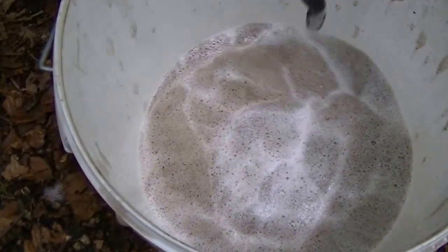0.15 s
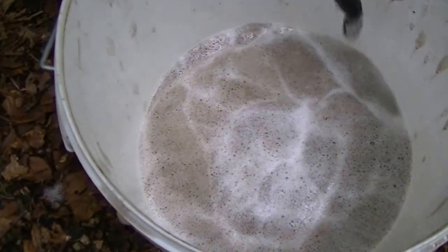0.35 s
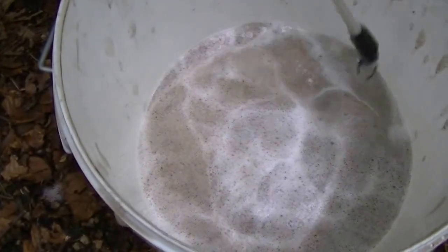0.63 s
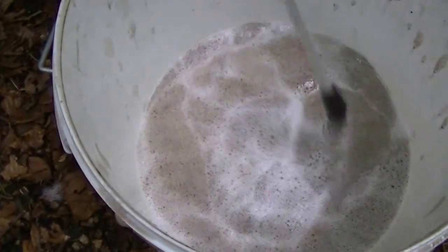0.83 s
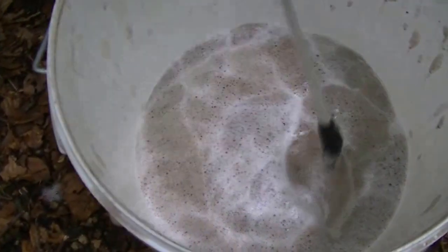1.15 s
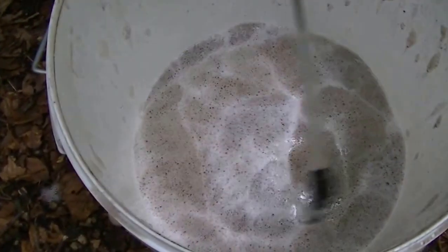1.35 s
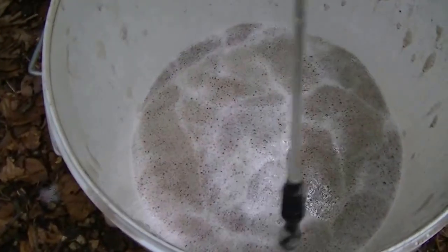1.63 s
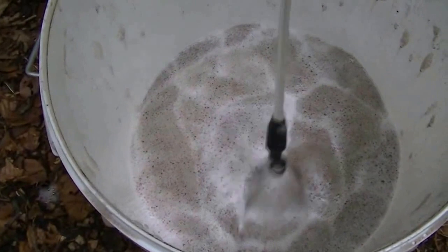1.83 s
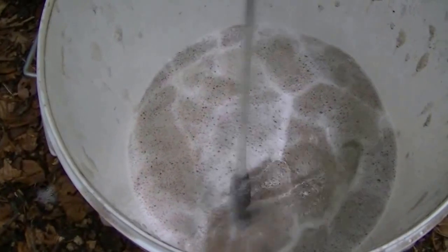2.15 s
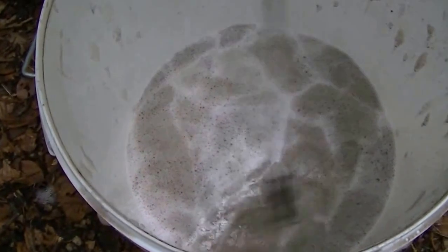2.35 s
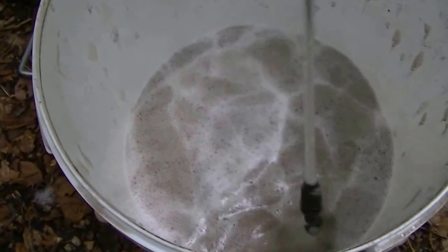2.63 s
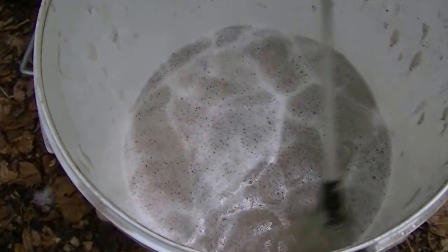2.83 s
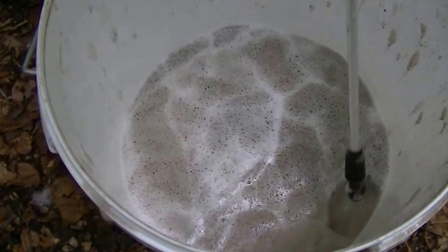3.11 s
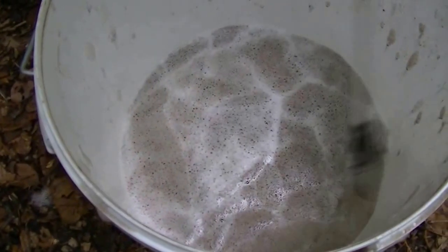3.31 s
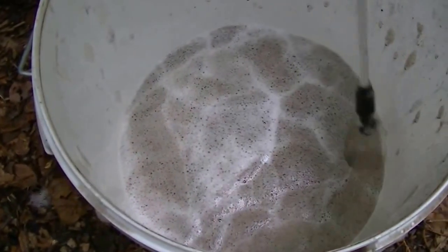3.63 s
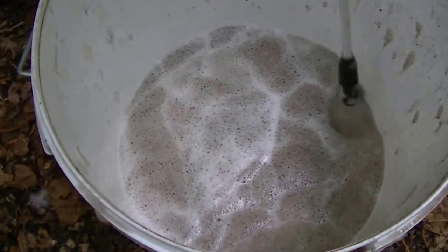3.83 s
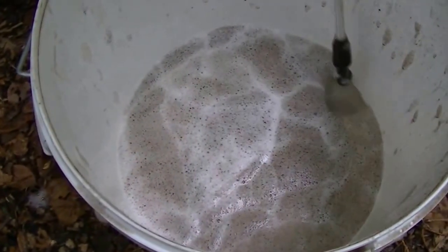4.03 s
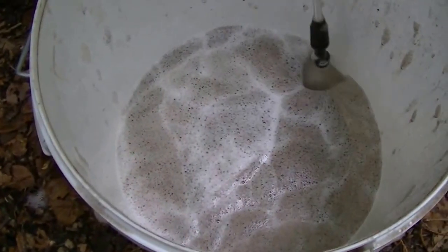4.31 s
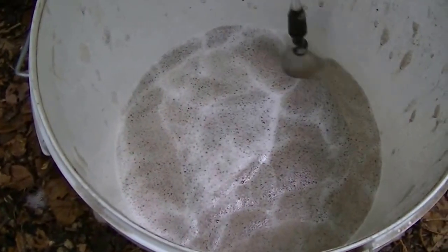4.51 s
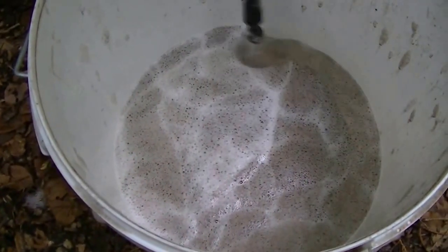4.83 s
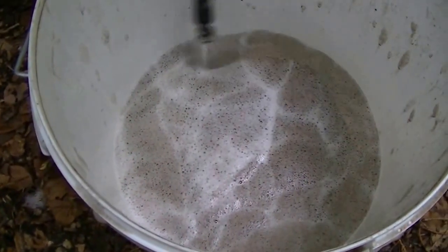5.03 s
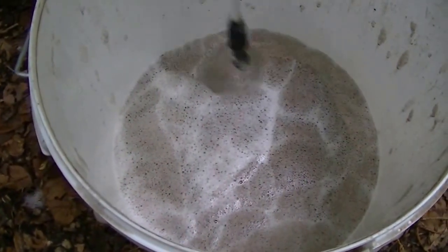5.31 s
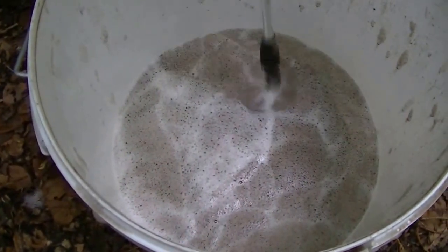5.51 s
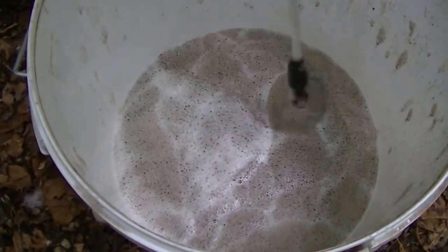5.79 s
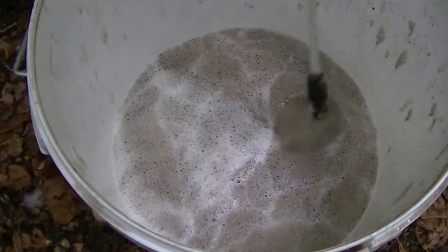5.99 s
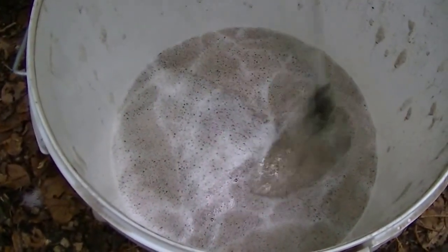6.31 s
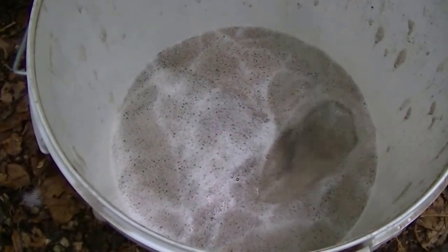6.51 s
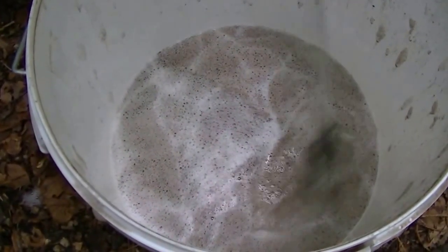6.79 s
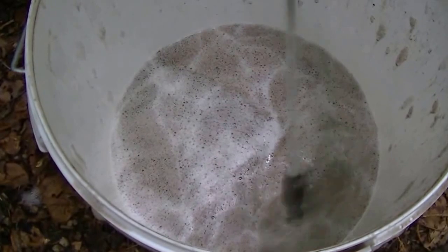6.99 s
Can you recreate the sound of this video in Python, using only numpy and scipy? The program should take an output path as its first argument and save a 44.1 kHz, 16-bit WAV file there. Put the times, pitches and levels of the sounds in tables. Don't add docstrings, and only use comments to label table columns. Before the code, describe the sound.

Close, almost centred pickup of water spraying into foamy liquid in a bucket outdoors. A sharp plastic knock opens over steady hiss; the jet stops abruptly for about half a second, exposing quiet bubble crackle, small lever clicks and a tiny valve sputter. The spray then returns quickly and continues to the end, slightly softer, fluttering and changing in hollow tint.

```python
import sys
import numpy as np
from scipy import signal
from scipy.fft import rfft, irfft, next_fast_len
from scipy.io import wavfile
from scipy.ndimage import uniform_filter1d, map_coordinates

SR = 44100
rng = np.random.default_rng(int(sys.argv[2]) if len(sys.argv) > 2 else 0)


def ratio(d):
    e = np.asarray(d, float) / 20
    return 10 ** e


def inscribe(sig):
    pcm = np.round(np.clip(np.atleast_2d(sig).T, -1, 1) * 32767)
    wavfile.write(sys.argv[1], SR, pcm.astype(np.int16))


N = 315315


def unit(x):
    return x / np.sqrt(np.mean(x ** 2) + 1e-20)


def along(points, hz):
    f, v = np.transpose(points)
    return np.interp(np.log(hz + 1), np.log(f + 1), v)


def curves(rows, t):
    s, *cols = np.transpose(rows)
    return [np.interp(t, s, c) for c in cols]


def wobble(knots_per_s):
    knots = rng.standard_normal(int(N * knots_per_s / SR) + 4)
    return map_coordinates(knots, [np.arange(N) * knots_per_s / SR])


def bump(x, centre, width):
    return np.exp(-((x - centre) / width) ** 2)


def filtered(x, response):
    m = next_fast_len(N + 8192)
    return irfft(rfft(x, m) * response(np.fft.rfftfreq(m, 1 / SR)), m)[..., :N]


def droplets(spiky_db):
    size = uniform_filter1d(rng.standard_normal(N), size=24)
    return unit(rng.standard_normal(N) * ratio(spiky_db * unit(size)))


def shaped(x, gain_db, patchy_db, streaky_db):
    hz, t, z = signal.stft(x, SR, nperseg=512, noverlap=384)

    def field(bins, frames):
        across_hz = uniform_filter1d(rng.standard_normal(z.shape), bins, 0)
        return unit(uniform_filter1d(across_hz, frames, 1))

    chance_db = patchy_db * field(bins=6, frames=30) + streaky_db * field(bins=2, frames=160)
    z = z * ratio(gain_db(hz[:, None], t) + chance_db)
    return signal.istft(z, SR, nperseg=512, noverlap=384)[1][:N]


# (frequency [Hz], density [dB per Hz])
RUMBLE_SPECTRUM = [(12, -45), (20, 6), (86, 3), (124, 6.5), (225, -47), (250, 0.5), (320, -25), (550, -120)]
# (frequency [Hz], density [dB per Hz])
AIR_SPECTRUM = [(60, -30), (130, -18), (240, -8), (500, -3), (1500, -3), (3200, -11), (8400, -13),
                (15800, -30)]


def rumble():
    noise = rng.standard_normal((3, N))
    common, left, right = filtered(noise, lambda hz: ratio(along(RUMBLE_SPECTRUM, hz)))
    air = filtered(rng.standard_normal((2, N)), lambda hz: ratio(along(AIR_SPECTRUM, hz)))
    far = unit(np.array([common + 0.86 * left, common + 0.83 * right]))
    return ratio(-91.5) * far + ratio(-70.5) * unit(air)


# (frequency [Hz], density [dB per Hz])
FIZZ_SPECTRUM = [(120, -52), (200, -28), (268, -7), (316, -10), (372, -3.5), (447, -8), (537, 1),
                 (1340, -3.5), (2280, -0.5), (3530, -4.5), (4900, -4), (8800, -9), (15800, -20.5)]
# (time [s], level [dB])
FOAM_LEVEL = [(1.07, -55), (1.27, -61), (1.36, -57), (1.42, -51), (1.49, -55.5), (1.57, -52), (2.9, -54),
              (5, -59), (7.15, -54.5)]
# (time [s], level over the fizz [dB])
VALVE_SPITS = [
    (1.431, 5),
    (1.451, 7),
    (1.477, 6),
]


def fizz_colour(hz, t):
    whistle_db = 12 * bump(hz, 1770, 70) + 6 * bump(hz, 2450, 150) - 2.5 * (hz > 3000)
    return along(FIZZ_SPECTRUM, hz) + bump(t, 1.46, .04) * whistle_db


def foam():
    t = np.arange(N) / SR
    fizz = unit(shaped(droplets(spiky_db=1.9), fizz_colour, patchy_db=2.1, streaky_db=1.24))
    spits_db = sum(db * bump(t, s, .007) for s, db in VALVE_SPITS)
    return fizz * ratio(curves(FOAM_LEVEL, t)[0] + spits_db + 0.73 + 0.41 * wobble(60))


# (time [s], peak [dB], ring [Hz], overtone re ring [dB], thud re peak [dB])
LEVER_KNOCKS = [(0.028, -21, 428, -27, -52), (0.139, -48, 300, -1, -17), (0.166, -36.5, 600, 10, -31),
                (.176, -43.5, 342, -22, -23), (1.369, -35.5, 587, 2, -20), (1.403, -50, 540, 6, -18),
                (1.424, -48, 610, -2, -26), (1.429, -42, 580, 5, -29), (1.446, -45, 500, -4, -22),
                (1.48, -44, 1210, 5, -28), (1.887, -41, 587, -4, -18), (1.897, -44, 349, 2, -26)]


def knocks():
    rings, pushes, t = np.zeros(N + SR), np.zeros(N + SR), np.arange(SR // 8) / SR
    for s, db, hz, over_db, thud_db in LEVER_KNOCKS:
        t60 = 16.5 / hz
        turns = 2 * np.pi * hz * np.cumsum(1 + 0.51 * np.exp(-t / 0.0017)) / SR
        overtone = ratio(over_db + 5 * t / t60) * np.sin(2 * np.pi * 1.87 * hz * t)
        ring = (np.sin(turns) + overtone) * ratio(-60 * t / t60) * (1 - np.exp(-t / 0.0011))
        snap = 1.1 * np.sin(2 * np.pi * 900 * t) * ratio(-60 * t / 0.0062)
        tick = np.sin(2 * np.pi * 1800 * t) * ratio(-60 * t / 0.002)
        crack = ratio(-7 - 60 * t / .003) * rng.standard_normal(len(t))
        sagging = 2 * np.pi * np.cumsum(150 + 150 * np.exp(-t / .012)) / SR
        push = np.sin(sagging) * bump(t, .012, .007)
        start = round(s * SR)
        rings[start:][:len(t)] += ratio(db) * (ring + snap + tick + crack)
        pushes[start:][:len(t)] += ratio(db + thud_db) * push
    low_cut = signal.butter(4, 330 / (SR / 2), "high", output="sos")
    return (signal.sosfilt(low_cut, rings) + pushes)[:N]


# (time [s], length [s], level [dB], frequency [Hz])
PUFFS = [
    (.172, .01, -70, 110),
    (1.465, .02, -57, 1780),
    (1.58, .012, -57, 1780),
    (1.58, .025, -58, 520),
]


def puffs():
    t = np.arange(N) / SR
    total = np.zeros(N)
    for s, length_s, db, hz in PUFFS:
        total += ratio(db + 2.7 * wobble(97)) * bump(t, s, length_s) * np.sin(2 * np.pi * hz * t)
    return total


# (frequency [Hz], width [Hz], gain [dB])
HOUSING_MODES = [(198, 47, -6), (776, 47, -0.5), (1135, 110, 3), (2250, 67, 2), (3920, 106, -3.5),
                 (4930, 940, 1.5), (5300, 150, -1), (6690, 280, -1.5), (7260, 210, 0.5)]


def housing(hz):
    return sum(db * bump(hz, centre_hz, width_hz) for centre_hz, width_hz, db in HOUSING_MODES)


def echo(hz, share, delay_ms, top_hz):
    strength = np.clip(share, -.9, .9) / (1 + (hz / top_hz) ** 2)
    return 20 * np.log10(abs(1 + strength * np.exp(-2j * np.pi * hz * delay_ms / 1000)))


# (frequency [Hz], density [dB per Hz])
JET_SPECTRUM = [(88, -49), (150, -51), (264, -28), (397, -24), (756, -8), (2340, -2), (3880, -2),
                (4720, -0.5), (10500, -5.5), (15800, -19.5)]
# (time [s], depth in the froth [dB], surface echo share [ratio],
# surface delay [ms], wall echo share [ratio], wall delay [ms])
NOZZLE_PATH = [(0.0, -0.7, 0.057, 0.75, 0.15, 0.92), (0.5, -2.5, 0.31, 0.69, 0.093, 0.77),
               (1.0, -3.5, 0.36, 0.73, 0.03, 0.74), (1.7, -4, 0.15, 0.76, 0.13, 0.48),
               (2.1, -4.09, 0.12, 0.72, 0.07, 0.36), (2.5, -3, 0.07, 0.81, 0.25, 0.8),
               (2.85, -3.5, 0.27, 0.68, 0.49, 0.66), (3.3, -5, 0.41, 0.78, 0.25, 0.56),
               (3.75, -5.5, 0.22, 0.68, 0.23, 0.43), (4.15, -3.5, 0.042, 0.7, 0.14, 0.27),
               (4.6, -2.5, 0.0058, 0.71, 0.19, 0.66), (4.95, -3, 0.19, 0.88, 0.22, 0.94),
               (5.3, -4.5, 0.0, 0.46, 0.04, 0.27), (5.7, -5, 0.21, 0.45, 0.26, 0.3),
               (6.1, -5, 0.2, 0.66, 0.24, 0.43), (6.45, -5, 0.27, 0.7, 0.12, 0.48),
               (6.8, -5, 0.15, 0.75, 0.02, 0.57), (7.15, -3.11, 0.2, 0.72, 0.37, 0.7)]
# (frequency [Hz], gain per dB of depth [dB/dB])
DEPTH_TILT = [(500, 2), (900, 1), (2500, 0.43), (6000, 0), (9000, -0.56)]
# (time [s], length [s], frequency [Hz], width [Hz], gain [dB])
BUCKET_SPOTS = [(0.62, 0.18, 2160, 250, -5.5), (1.72, 0.066, 2270, 290, 8.5), (2.1, 0.16, 2670, 150, -10),
                (2.8, .2, 450, 100, 15), (4.197, 0.17, 3340, 350, 4.5), (4.74, 0.21, 1960, 450, 5.5),
                (5.0, 0.16, 6200, 500, -4), (5.32, 0.15, 4170, 1250, 3), (5.76, .1, 4100, 210, -12),
                (5.8, 0.43, 2550, 120, -7), (4.4, 0.35, 7800, 1200, -3), (2.2, .2, 2100, 130, 5),
                (2.35, .3, 880, 100, -7), (2.63, .2, 3500, 180, 2.5), (3.15, .15, 1500, 130, 7),
                (3.6, .2, 3400, 160, 2.5), (4.2, .15, 1480, 130, -2.5), (4.4, 0.23, 990, 120, 3),
                (4.35, 0.28, 6400, 350, -2), (5.4, 0.26, 2080, 330, 2.5), (6.5, 0.86, 770, 83, 5),
                (6.55, .12, 1550, 110, 7), (5.7, 0.61, 13000, 1600, 1), (2.1, .2, 3300, 200, 3.5)]


def spray_colour(hz, t):
    depth_db, surface, surface_ms, wall, wall_ms = curves(NOZZLE_PATH, t)
    colour = along(JET_SPECTRUM, hz) + housing(hz)
    colour = colour + (depth_db + 4) * along(DEPTH_TILT, hz)
    colour = colour + echo(hz, -surface, surface_ms, top_hz=5200) + echo(hz, wall, wall_ms, top_hz=3000)
    for s, length_s, spot_hz, width_hz, db in BUCKET_SPOTS:
        colour = colour + db * bump(t, s, length_s) * bump(hz, spot_hz, width_hz)
    return colour


# (time [s], hiss level [dB])
FLOW_LEVEL = [(0, -34), (.15, -36.5), (.356, -34.5), (.77, -37.5), (1.05, -36.5), (1.78, -37.5),
              (1.81, -39), (2.1, -38), (2.76, -40), (3.04, -38.5), (3.88, -36), (3.93, -36.5), (4.77, -37),
              (4.92, -37.5), (5.28, -34.5), (5.9, -39), (6.32, -38), (7.15, -41)]
# (time [s], length [s], gain [dB])
JET_SURGES = [
    (0.171, 0.0088, 2.5),
    (3.154, 0.08, -2),
    (5.937, 0.025, -1),
    (6.04, 0.022, 1.5),
    (6.82, 0.028, 2),
    (6.86, .03, -1),
    (6.95, .04, 1),
    (7.015, .03, -1.5),
    (7.097, 0.024, 1.5),
]


def spray():
    release_s, closing_db_per_s = 1.0565, 1300
    press_s, opening_s, first_share = 1.585, 0.048, 0.27
    t = np.arange(N) / SR
    closing = ratio(-closing_db_per_s * np.clip(t - release_s, 0, 1))
    since_s = np.clip(t - press_s, 0, 9)
    opening = 1 - (1 - first_share) * np.exp(-since_s / opening_s) - first_share * np.exp(-since_s / .004)
    surges_db = sum(db * bump(t, s, length_s) for s, length_s, db in JET_SURGES)
    flutter_db = 0.16 * wobble(14) + 0.44 * wobble(45)
    jet = unit(shaped(droplets(spiky_db=0.0), spray_colour, patchy_db=0.79, streaky_db=1.2))
    return jet * (closing + opening) * ratio(curves(FLOW_LEVEL, t)[0] + surges_db + 0.33 + flutter_db)


# (frequency [Hz], left-right difference [dB])
LEFT_LEAN = [(1300, 0), (2000, .9), (2600, 1.5), (3600, 1.1), (4800, .7), (7000, .2), (9000, 0)]
# (frequency [Hz], side re mid [dB])
DIFFUSE_SPREAD = [(300, -34), (900, -35), (1600, -36), (2400, -29), (3500, -26), (5000, -20), (6200, -31),
                  (8000, -26), (15000, -30)]


def scene():
    mid = spray() + foam() + knocks() + puffs()
    lean = filtered(mid, lambda hz: np.tanh(along(LEFT_LEAN, hz) * np.log(10) / 40))
    lean = lean * np.interp(np.arange(N) / SR, [0, 4.2, 4.8, 7.15], [1.2, 1.1, 1.8, 1.2])
    scatter = rng.standard_normal(2000) * ratio(-60 * np.arange(2000) / 2000)
    diffuse = signal.fftconvolve(mid, scatter / np.linalg.norm(scatter))[:N]
    spread = shaped(diffuse, lambda hz, s: along(DIFFUSE_SPREAD, hz) + .3, patchy_db=5.0, streaky_db=5)
    side = lean + spread
    return np.array([mid + side, mid - side]) + rumble()


def roll_off(x):
    return signal.sosfilt(signal.butter(12, 16010, fs=SR, output="sos"), x)


def record(dry):
    mix = filtered(dry, lambda hz: hz < 15830)
    return roll_off(mix)


dry = scene()
out = record(dry)
inscribe(out)
```